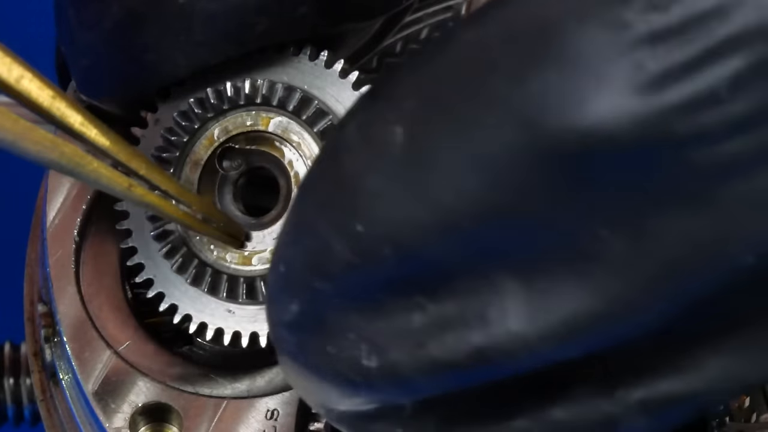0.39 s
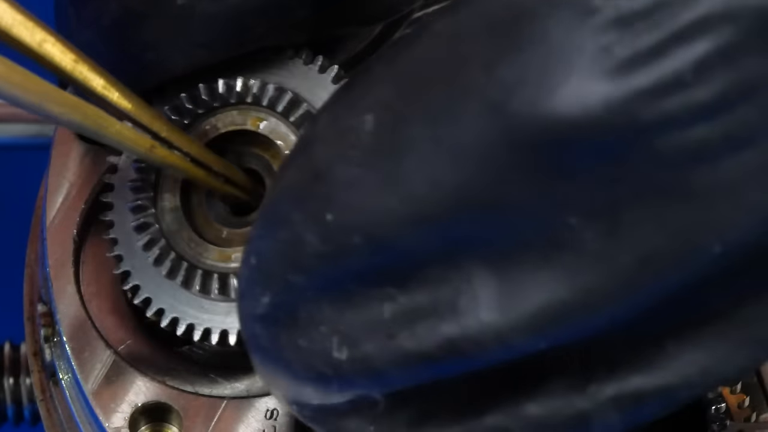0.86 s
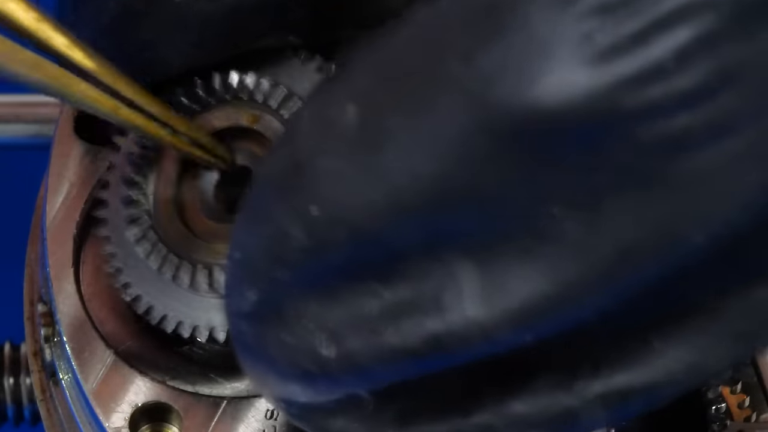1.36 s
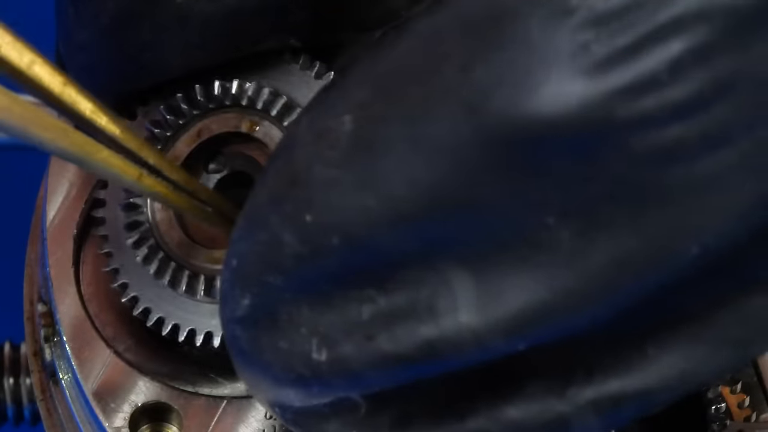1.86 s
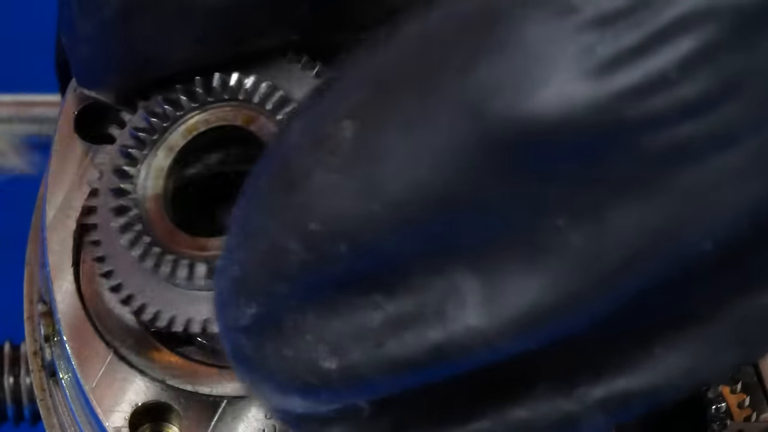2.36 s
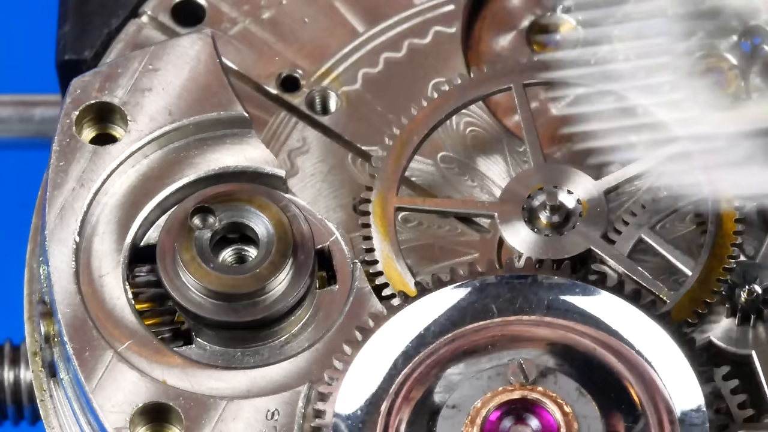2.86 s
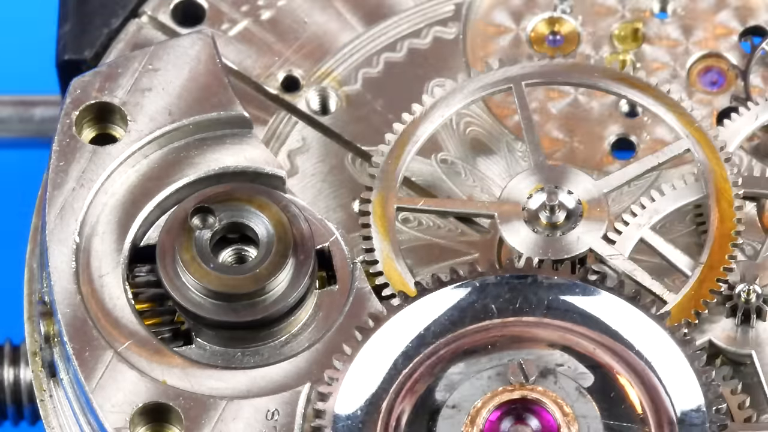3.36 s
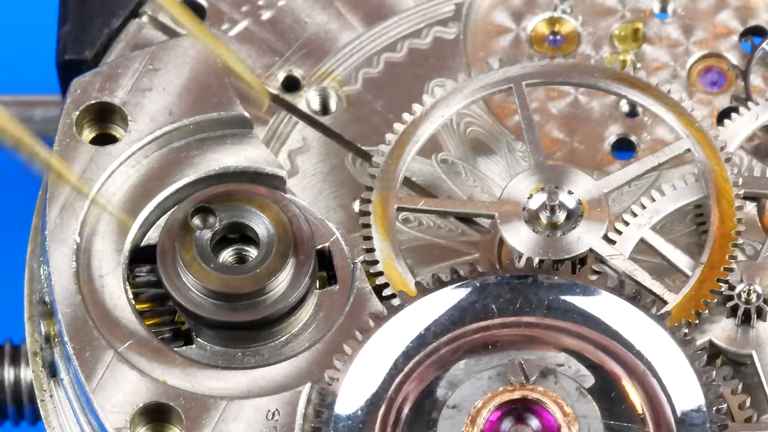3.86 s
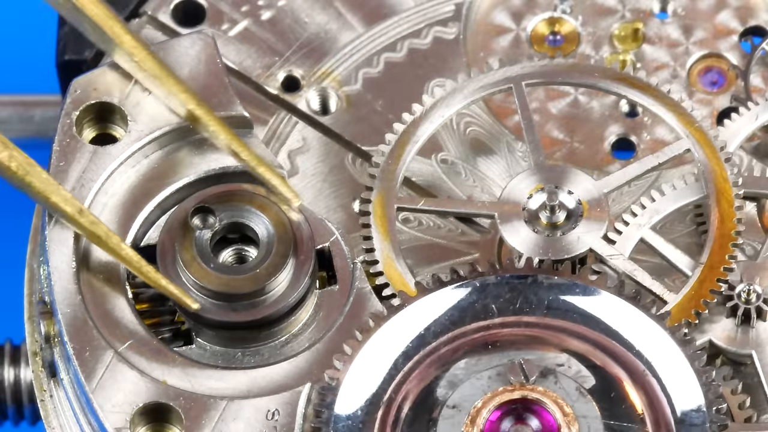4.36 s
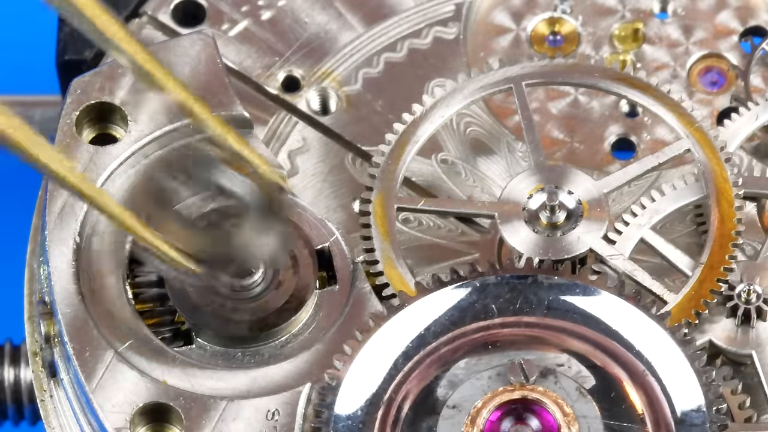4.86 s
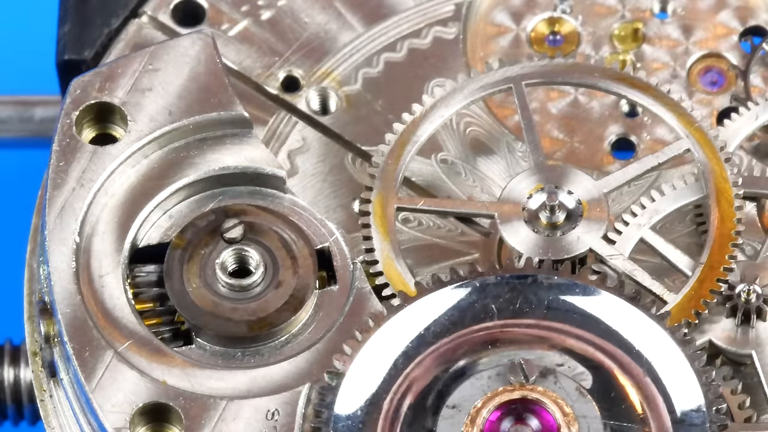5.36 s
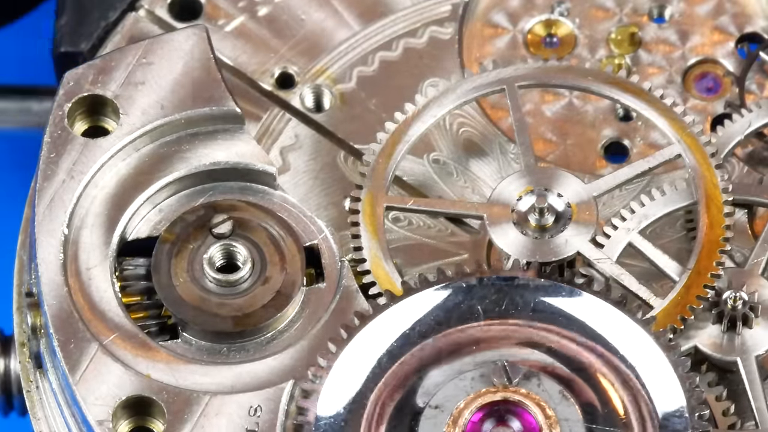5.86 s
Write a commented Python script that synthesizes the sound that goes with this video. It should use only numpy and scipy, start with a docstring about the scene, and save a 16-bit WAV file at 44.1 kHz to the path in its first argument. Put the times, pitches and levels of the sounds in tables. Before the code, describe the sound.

A quiet room heard through a very close two-capsule microphone on a workbench: soft low rumble that slowly fades, faint hum near 120 Hz and gentle wide hiss. From 0 to 1.9 s, a gloved finger shifts softly with muffled rubbing, low thuds press through the bench, and tweezer tips give scattered dry ticks and short scrapes. At 2.0 s comes the strongest moment, a heavy thud with bright clicks and a gritty scratch, then a clean tap. From 2.4 to 3.9 s a wheel slides off with thin uneven rubbing, strongest near 3.4 s, brief high squeaks at 3.0 and 3.3 s, soft bumps at 3.25 to 3.45 s and a tiny tone at 3.7 s. Two crisp ringing taps fall at 4.4 and 4.5 s. A faint hollow drone swells around 5.3 s, with small scrapes and soft set-downs at 5.27 and 5.74 s.

```python
"""A quiet room: fine tweezers work on a watch movement clamped on a bench, close to a two-capsule microphone
resting on the same bench. Rumble, hum and hiss (noise and a sine) run throughout; a gloved finger shifts on the
holder, pushes thud (ringing bench modes), then tips tick and scrape (noise bursts, ringing metal, rubbing noise).
After a hard touch near 2 s come clean taps and a wheel slid off, with squeaks, soft bumps and a faint tone;
more touches follow, then narrow noise bands swell as a hollow drone before the last part is set down."""
import sys
import numpy as np
from scipy import signal
from scipy.fft import rfft, irfft
from scipy.io import wavfile
from scipy.ndimage import uniform_filter1d

SR = 44100
rng = np.random.default_rng(int(sys.argv[2]) if len(sys.argv) > 2 else 0)


def how_loud(loudness_db):
    """Turn decibels into a plain amplitude multiplier (0 dB gives 1, 20 dB gives 10)."""
    steps = np.asarray(loudness_db, float) / 20
    return 10 ** steps


def dump(signal):
    """Clip the signal to [-1, 1] and save it as 16-bit WAV at the path in sys.argv[1]."""
    limited = np.clip(np.atleast_2d(signal).T, -1, 1)
    pcm = np.round(limited * 32767).astype(np.int16)
    wavfile.write(sys.argv[1], SR, pcm)


N = 263321
T = np.arange(N) / SR  # seconds

# Spectrum of the room at the microphone. Each row: frequency in Hz, relative density in dB per Hz.
ROOM_SPECTRUM = [(20, -25), (45, -3), (110, -1), (210, -11), (500, -20), (1000, -25.5), (2500, -31),
                 (8000, -33.5), (15500, -35)]
# How the hiss differs left and right. Each row: frequency in Hz, level in dB against the room.
SIDE_SPECTRUM = [(30, -13), (1000, -9), (12000, -2)]
# A gloved finger shifts on the holder. Each row: start in seconds, length in seconds, level in dB rms.
FINGER_SHIFTS = [(0, 0.15, -66), (0.75, 0.051, -59), (0.857, 0.077, -59), (4.633, 0.16, -65)]
# Modes of the movement holder. Each row: frequency in Hz, relative level in dB, 60 dB decay in seconds.
HOLDER_MODES = [(222, 8, 0.053), (312.4, 9.5, 0.12), (438, 0.5, 0.1), (710, 5, 0.046), (1056, 7, 0.023)]
# Modes of the bench top. Each row: frequency in Hz, relative level in dB, 60 dB decay in seconds.
BENCH_MODES = [(39, -7.5, 0.2), (54, -5.5, 0.16), (89.5, -1, 0.37), (119.8, 12.5, 0.098),
               (166.4, 13.5, 0.13)]
# Modes of movement and tweezers. Each row: frequency in Hz, relative level in dB, 60 dB decay in seconds.
METAL_MODES = [(1850, 1.5, 0.014), (2210, 1.5, 0.013), (2960, 3, 0.014), (3450, -1.5, 0.025),
               (4700, 3.5, 0.01), (5754, 13.5, 0.015), (7810, 8, 0.013), (9500, 5, 0.014),
               (11800, 10.5, 0.0089)]
# Pushes felt through the bench. Each row: start in seconds, peak in dB, pitch that rings most in Hz.
PUSHES = [(0.002, -37.5, 39), (0.059, -41, 86), (0.315, -42, 39.7), (0.342, -41, 57), (0.6, -38.5, 39.2),
          (0.746, -40, 76), (0.766, -33, 39), (0.897, -42.5, 96.2), (0.997, -37.5, 49.3),
          (1.086, -40, 60.3), (1.229, -41, 46.5), (1.339, -36, 46.6), (1.4, -39, 45.5), (1.619, -35, 54),
          (1.81, -45.5, 52.7), (1.993, -25.5, 46.2), (2.059, -28, 59.4), (2.155, -37.5, 57.7),
          (2.17, -37, 49), (2.428, -32.5, 58.8), (2.618, -37.5, 62.4), (3.599, -39.5, 38.6),
          (3.671, -48.5, 132.6), (3.906, -52, 141), (4.406, -48, 93), (4.481, -48, 76.5),
          (4.925, -45, 53.7)]
# Touches of the tips. Each row: start in seconds, peak of the snap in dB, pitch that rings most in Hz.
TOUCHES = [(0.3147, -41.5, 3500), (0.323, -38.5, 2170), (0.3388, -39.5, 3700), (0.744, -42, 3080),
           (0.7526, -44.5, 3020), (0.773, -45, 3450), (0.802, -59, 2300), (0.895, -56, 3450),
           (1.086, -43, 2510), (1.2256, -44, 3620), (1.3419, -48, 4170), (1.359, -47.5, 3130),
           (1.4008, -44.5, 3300), (1.6243, -45.5, 2230), (1.816, -42, 2960), (1.994, -32.5, 2960),
           (2.0153, -31, 10600), (2.0235, -31, 8400), (2.0804, -44, 7150), (2.089, -51, 7000),
           (2.1566, -46, 2770), (2.167, -44.5, 4440), (2.5422, -52.5, 6550), (2.571, -55, 3840),
           (2.59, -51.5, 7760), (2.6183, -54.5, 7360), (2.6436, -47.5, 5100), (2.7816, -49.5, 2140),
           (3.248, -44, 5200), (3.3173, -42.5, 2300), (3.4141, -37, 4400), (3.4663, -37.5, 4540),
           (3.505, -62, 9500), (3.674, -57, 5240), (3.76, -57, 5200), (3.846, -53, 5240),
           (3.854, -58, 5270), (4.4061, -37.5, 8700), (4.4775, -38.5, 9500), (4.7077, -53.5, 4650),
           (4.929, -54.5, 2470), (5.2734, -45, 2600), (5.745, -51, 1670)]
# Short scrapes of the tips. Each row: start in seconds, length in seconds, hiss in dB, body in dB above it.
SCRAPES = [(0.607, 0.024, -68, 8.5), (0.882, 0.025, -79.5, 16), (1.062, 0.037, -61, 1.5),
           (1.327, 0.059, -70.5, 8), (2.016, 0.026, -49, -4.5), (2.039, 0.026, -43.5, -3.5),
           (2.074, 0.031, -59, -7.5), (5.157, 0.025, -63, -8), (5.225, 0.018, -70.5, 3)]
# A wheel is slid off and carried away, rubbing in uneven swells.
# Each row: time in seconds, level in dB of hiss and hollow together.
WHEEL_LIFT = [(2.4, -78), (2.434, -66.5), (2.638, -76.5), (2.646, -62.5), (2.676, -70), (2.692, -58.5),
              (2.706, -68.5), (2.81, -61.5), (2.878, -79), (2.95, -54.5), (2.988, -74.5), (3.036, -60),
              (3.154, -71.5), (3.242, -62), (3.396, -58.5), (3.416, -47), (3.468, -48), (3.476, -62.5),
              (3.53, -73.5), (3.586, -69), (3.598, -57), (3.654, -88), (3.75, -70.5), (3.79, -90),
              (3.802, -64), (3.852, -69), (3.882, -94)]
# The hollow drifts in pitch and comes and goes in strength as the wheel slides.
# Each row: time in seconds, pitch in Hz, level in dB above the hiss.
WHEEL_HOLLOW = [(2.8, 5780, -6), (3.25, 5220, 6), (3.442, 4755, 4), (3.598, 5060, -8), (3.8, 5330, 4)]
# Clean taps on the holder. Each row: start in seconds, peak in dB, pitch that rings most in Hz.
HOLDER_TAPS = [(2.059, -39.5, 710), (2.429, -49, 750), (4.408, -39, 350), (4.479, -38, 366),
               (5.275, -46.5, 990)]
# Thin squeaks of a slipping part. Each row: start in seconds, length in seconds, level in dB rms.
PART_SQUEAKS = [(2.986, 0.043, -73), (3.265, 0.045, -61.5)]
# Multiples of the squeak's pitch that carry. Each row: order, relative level in dB.
SQUEAK_MULTIPLES = [(5, 7), (6, 4), (7, 2)]
# Parts set down softly. Each row: start in seconds, peak in dB, rocking pitch in Hz.
SET_DOWNS = [(3.26, -32, 130), (3.39, -41, 116.4), (3.448, -29.5, 110.4), (5.267, -44, 112.7),
             (5.737, -44, 113.3)]
# A lone faint tone. Its one row: start in seconds, length in seconds, peak in dB, pitch in Hz.
FAINT_TONE = (3.69, 0.055, -70, 4200)
# Swell of the hollow drone. Each row: time in seconds, level in dB.
DRONE_SWELL = [(4.5, -85.5), (5.3, -70.5), (5.65, -104)]
# Noise bands of the drone. Each row: centre in Hz, width in Hz, level in dB against the swell.
DRONE_NOISE = [(519, 120, 3.7), (848, 150, 0.41)]


def level(x, db):
    """Scale to an rms level."""
    return x * how_loud(db) / np.sqrt(np.mean(x ** 2))


def coloured(points):
    """Noise with a spectrum of (Hz, dB) points."""
    hz, db = np.transpose(points)
    f = np.maximum(np.arange(N // 2 + 1) * SR / N, 1)
    gain = how_loud(np.interp(np.log(f), np.log(hz), db)) * (f > 15)
    return irfft(rfft(rng.standard_normal(N)) * gain, N)


def band(x, hz, width):
    """Two-pole resonance, gain 1 at the centre."""
    return signal.lfilter(*signal.iirpeak(min(hz, 0.45 * SR), hz / width, fs=SR), x)


def double_band(x, hz, width):
    """The same resonance twice, for steeper flanks."""
    return band(band(x, hz, width), hz, width)


def walk(rate):
    """Random levels held 1 / rate s and slewed twice; spread near 1."""
    hold = int(SR / rate)
    steps = np.repeat(rng.standard_normal(N // hold + 1), hold)
    return 1.3 * uniform_filter1d(uniform_filter1d(steps, hold), hold)[:N]


def ring(modes, centre_hz, spread, length, detune=1):
    """Free decay of the modes; those near the struck spot's pitch (spread in octaves) get most of the blow."""
    hz, db, t60 = np.transpose(modes)[:, :, None]
    t = np.arange(length) / SR
    share = how_loud(db) / (1 + (np.log2(hz / centre_hz) / spread) ** 2) ** 1.07
    decay = np.exp(-np.log(1000) * t / t60)
    return np.sum(share * decay * np.sin(2 * np.pi * hz * detune * t), axis=0)


def stroke(s, length):
    """Pressure rises and falls softly, a little beyond the firm part of the stroke."""
    return np.exp(-(np.abs(T - s - length / 2) / (0.5 * length)) ** 3)


def half_sine(s, length):
    """A swell from nothing to 1 and back."""
    return np.sin(np.pi * np.clip((T - s) / length, 0, 1))


def add(out, s, db, sound):
    """Place a sound with a given peak level."""
    i = int(s * SR)
    out[i:i + len(sound)] += (how_loud(db) * sound / np.max(np.abs(sound)))[:len(out) - i]


def rumble():
    """Low noise that wavers and slowly fades through the scene."""
    fade_db_per_s = 2.2
    low = double_band(rng.standard_normal(N), 36, 33)
    return level(low * how_loud(0.51 * walk(5.37) - fade_db_per_s * T), -58)


def hum():
    """A sine whose phase and level are slightly unsteady."""
    phase = 2 * np.pi * 119.5 * T + 0.85 * walk(6.2)
    return level(np.sin(phase) * how_loud(0.51 * walk(19)), -66.5)


def room():
    """Rumble, hum and smooth hiss; mainly the treble of the hiss differs left and right."""
    air = coloured(ROOM_SPECTRUM)
    hz, db = np.transpose(ROOM_SPECTRUM)
    apart = coloured([(f, g + np.interp(np.log(f), np.log(hz), db)) for f, g in SIDE_SPECTRUM])
    scale = how_loud(-63.5) / np.std(air)
    return scale * air + rumble() + hum() + scale * apart * np.array([[1], [-1]])


def shifts():
    """Rubber drags in soft jerks and shakes the lower modes of the holder."""
    drag = rng.standard_normal(N) * how_loud(3 * walk(60))
    shake = level(sum(how_loud(db) * band(drag, hz, 44) / hz for hz, db, _ in HOLDER_MODES if hz < 800), 0)
    return shake * sum(how_loud(db) * stroke(s, length) for s, length, db in FINGER_SHIFTS)


def thuds():
    """A press and release lasts a fraction of the period it excites most; the holder rocks under a damping finger."""
    knock_db = -8  # the holder's knock beside a push
    out, t = np.zeros(N), np.arange(900) / SR
    rocking = rng.standard_normal((len(PUSHES), len(t))) * np.exp(-t / 0.0097)
    finger_damping = np.exp(-np.arange(3000) / SR / 0.004)
    knock = ring(HOLDER_MODES, 187, 0.7, 3000) * finger_damping
    for (s, db, hz), rock in zip(PUSHES, rocking):
        push = np.gradient(np.hanning(int(0.36 * SR / hz) + 3))
        add(out, s, db, signal.fftconvolve(ring(BENCH_MODES, hz, 0.12, 12000), push))
        add(out, s, db + knock_db, signal.fftconvolve(knock, rock))
    return out


def ticks():
    """Each touch chatters for a millisecond or two, rings the metal briefly and cracks in the treble."""
    ring_db, nudge_db, crack_db = -1.5, -14.5, -7.5  # metal, holder and treble beside the snap
    grip_scatter_db, crack_scatter_db = 2.5, 3
    out, t = np.zeros(N), np.arange(1000) / SR
    chance = rng.standard_normal((len(TOUCHES), 3, len(t)))
    count = len(METAL_MODES)
    for (s, db, hz), (chatter, crack, grip) in zip(TOUCHES, chance):
        snap = double_band(grip * np.exp(-t / 0.00032), hz, 0.38 * hz)
        add(out, s, db, snap)
        # the grip shifts pitch and level of every mode differently from touch to touch
        gripped = np.array(METAL_MODES) + np.outer(crack[:count], [0, grip_scatter_db, 0])
        modes = ring(gripped, hz, 0.5, len(t), 1 + 0.036 * grip[:count, None])
        blows = (chatter * np.exp(-t / 0.0012))[:300]
        add(out, s, db + ring_db, np.convolve(modes, blows)[:len(t)])
        nudge = ring(HOLDER_MODES, 640, 0.41, len(t)) * np.exp(-t / 0.0021)
        add(out, s, db + nudge_db, nudge)
        treble = double_band(crack * np.exp(-t / 0.0012), 10700, 12000)
        add(out, s, db + crack_db + crack_scatter_db * crack[-1], treble)
    return out


def slides():
    """Surface grit gives noise with catches; it hisses, rings a small hollow and shakes movement and holder."""
    catch_db, catch_share = 4.5, 0.23  # mean catch before its 22 dB cap; its share beside the steady rub
    flicker_db, lift_body_db = 3, -5.5
    catches = how_loud(np.minimum(catch_db * rng.exponential(size=N // 60 + 1), 22)).repeat(60)[:N]
    grit = rng.standard_normal((3, N)) * (1 + catch_share * catches)

    treble = sum(how_loud(db + flicker_db * walk(50)) * band(grit[0], hz, 930)
                 for hz, db, _ in METAL_MODES if hz > 4000)
    hiss = level(band(grit[0], 6400, 9400), 0)
    scrape = level(hiss + level(treble, 4), 0)

    s, hz, hollow_db = np.transpose(WHEEL_HOLLOW)
    phase = 2 * np.pi * np.cumsum(np.interp(T, s, hz)) / SR
    smooth = uniform_filter1d(uniform_filter1d(grit[1], 27), 27)
    hollow = level(smooth * np.sin(phase), 0)  # low noise moved up to the drifting pitch

    body = level(sum(how_loud(db + flicker_db * walk(50)) * double_band(grit[2], hz, 540)
                     for hz, db, _ in METAL_MODES if hz < 4000), 0)
    holder = level(double_band(grit[2], 570, 770), -6)

    hollow_gain = how_loud(np.interp(T, s, hollow_db))
    # the lift curve is the level of hiss and hollow together
    rub = (hiss + hollow_gain * hollow + how_loud(lift_body_db) * body) / np.hypot(1, hollow_gain)
    out = rub * how_loud(np.interp(T, *np.transpose(WHEEL_LIFT), -120, -120))
    for s, length, db, body_db in SCRAPES:
        out += stroke(s, length) * how_loud(db) * (scrape + how_loud(body_db) * (body + holder))
    return out


def taps():
    """A clean blow leaves the holder free to ring."""
    out = np.zeros(N)
    for s, db, hz in HOLDER_TAPS:
        add(out, s, db, -ring(HOLDER_MODES, hz, 0.53, 8000))
    return out


def squeaks():
    """Quick stick-slip: an unsteady pitch of which only the upper multiples carry."""
    pitch_hz = 1880 * (1 + 0.0118 * walk(500))
    phase = 2 * np.pi * np.cumsum(pitch_hz) / SR
    tone = level(sum(how_loud(db + 2.2 * walk(200)) * np.sin(k * phase) for k, db in SQUEAK_MULTIPLES), 0)
    return tone * sum(how_loud(db) * half_sine(s, length) for s, length, db in PART_SQUEAKS)


def bumps():
    """A part set down softly rocks the bench for a couple of periods before it rings on."""
    out = np.zeros(N)
    for s, db, hz in SET_DOWNS:
        size = int(1.8 * SR / hz)
        push = np.hanning(size) * np.sin(2 * np.pi * hz * np.arange(size) / SR)
        add(out, s, db, signal.fftconvolve(ring(BENCH_MODES, 0.806 * hz, 0.42, 12000), push))
        seat = ring(HOLDER_MODES, 276, 1.0, 500) * np.hanning(500)  # it seats on the holder
        add(out, s + size / SR, db - 14.5, seat)
    return out


def faint_tone():
    """A single sine that swells and fades."""
    s, length, db, hz = FAINT_TONE
    return how_loud(db) * np.sin(2 * np.pi * hz * T) * half_sine(s, length)


def drone():
    """Narrow noise bands that swell together."""
    s, db = np.transpose(DRONE_SWELL)
    noise = sum(how_loud(band_db) * level(double_band(rng.standard_normal(N), hz, width), 0)
                for hz, width, band_db in DRONE_NOISE)
    return noise * how_loud(np.interp(T, s, db, -120, -120))


def scene():
    """The metal sounds reach the two capsules with short reflections of opposite sign."""
    metal = ticks() + slides() + squeaks() + faint_tone()
    echo = rng.choice([-1, 1], 200) * (np.arange(200) > 8)  # reflections 0.2 to 4.5 ms late
    side = np.convolve(metal, echo * how_loud(-41))[:N]
    middle = metal + thuds() + bumps() + taps() + shifts() + drone()
    return middle + side * np.array([[1], [-1]]) + room()


def top_cut(x):
    """Nothing passes above the cut-off."""
    return signal.sosfilt(signal.butter(12, 16800, fs=SR, output="sos"), x)


def record(dry):
    """A steep low-pass cuts the top end above 16.2 kHz."""
    low_pass = signal.ellip(8, 0.2, 50, 16200, fs=SR, output="sos")
    mix = signal.sosfilt(low_pass, dry)
    return top_cut(mix)


dry = scene()
out = record(dry)
dump(out)
```